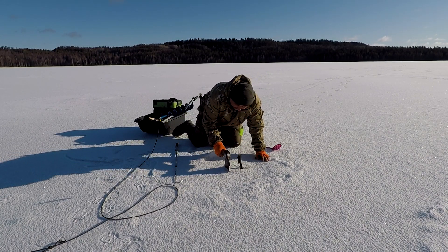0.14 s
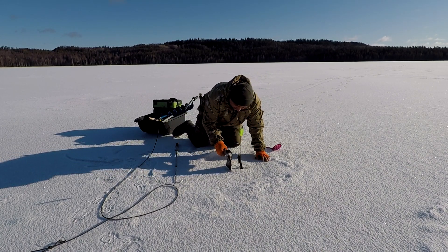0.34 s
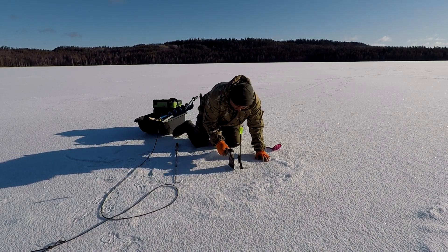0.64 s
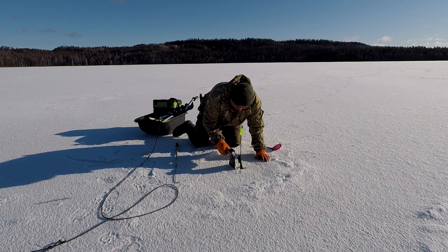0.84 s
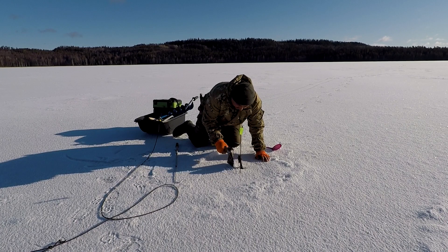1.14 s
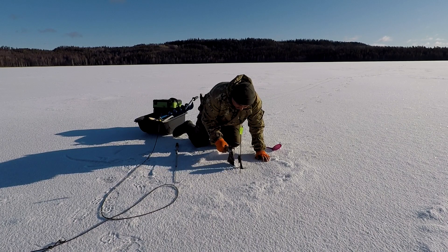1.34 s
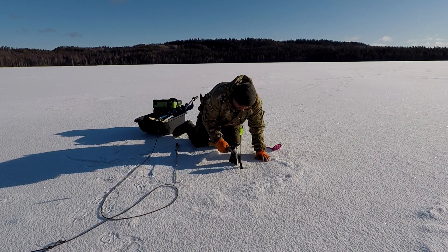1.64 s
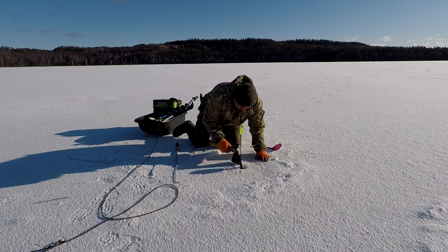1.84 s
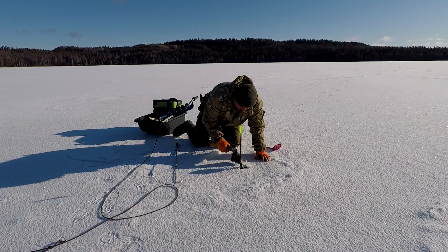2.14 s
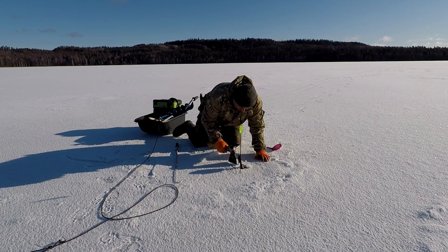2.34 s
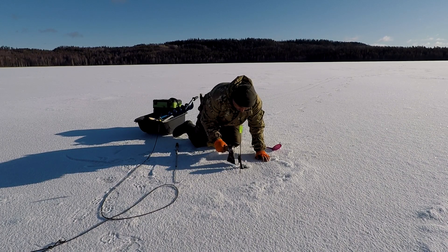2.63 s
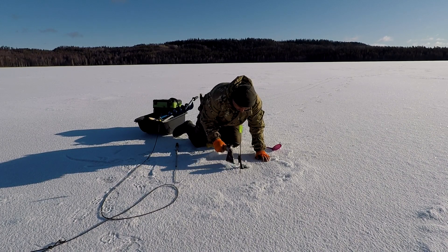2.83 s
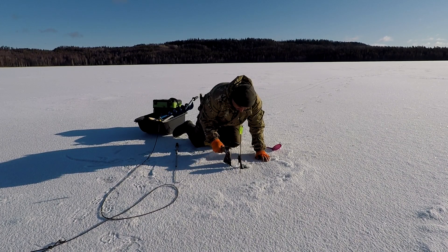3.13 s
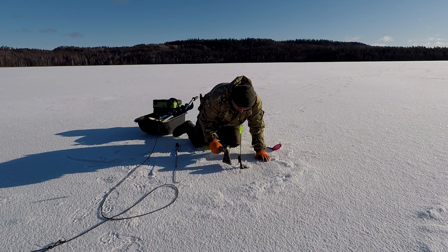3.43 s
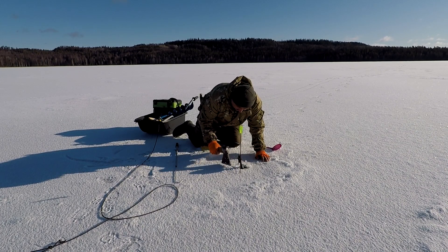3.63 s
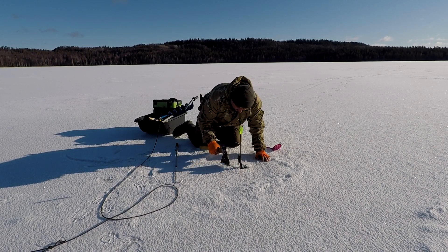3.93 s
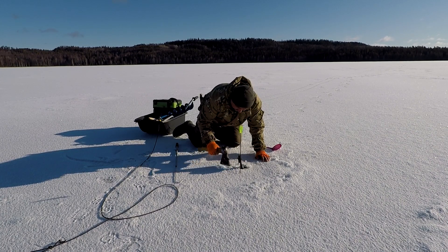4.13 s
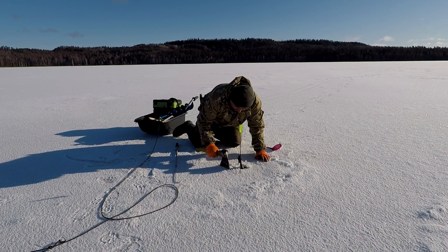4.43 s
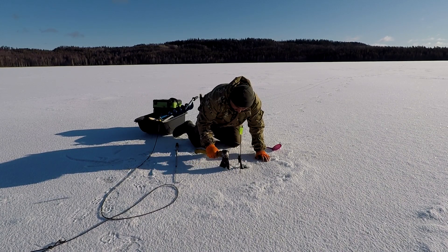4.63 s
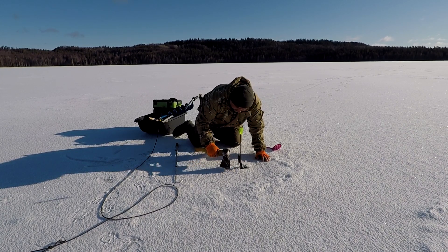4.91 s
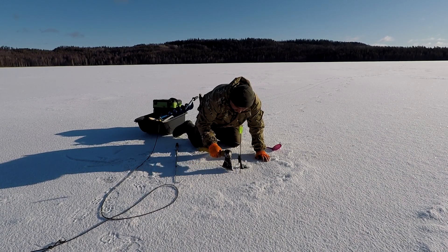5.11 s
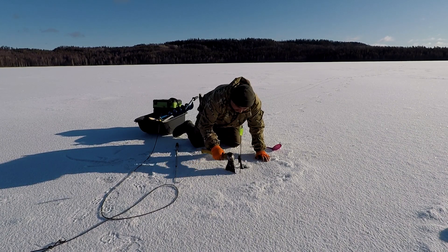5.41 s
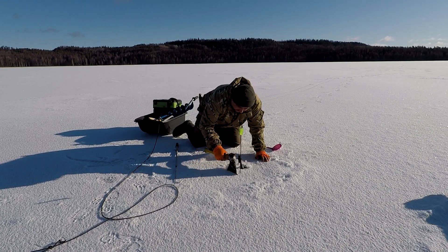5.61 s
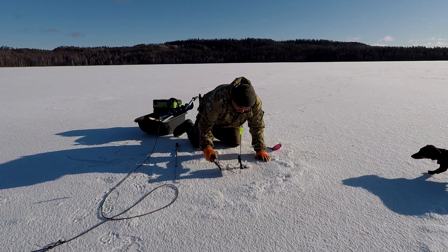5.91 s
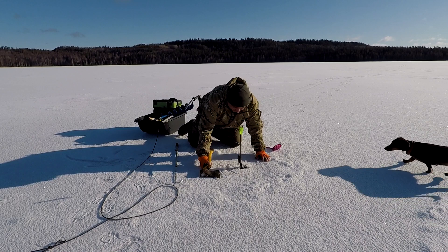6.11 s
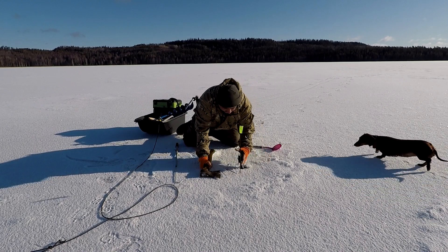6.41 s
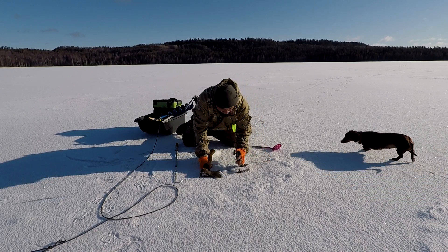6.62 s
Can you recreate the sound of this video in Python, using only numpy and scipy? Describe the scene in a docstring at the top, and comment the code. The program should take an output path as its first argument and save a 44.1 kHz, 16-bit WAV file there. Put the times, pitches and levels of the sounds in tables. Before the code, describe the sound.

On an open frozen lake, a person kneeling at a hole chips the ice with a small steel hatchet, five or six dry crunchy knocks a second, each with a short low thud. Faint metallic rings and small falling chips sit between blows. Wind rumbles on the microphone, strongest in the first three seconds, over steady hiss. Chopping stops at about six seconds; crusted snow then crackles briefly. No echo.

```python
"""A small steel hatchet chips at lake ice, five or six blows a second: noise through resonances crunches
and knocks, swelling sines thud. Sines ring the blade until the next blow; chips drop back as small cracks.
At the end crusted snow breaks under a weight in gritty cracks. Faint narrow-band noise flickers near 5.7 kHz.
Gusty wind, two bands of noise, rumbles on one microphone over its steady noise hiss; the open lake adds no echo.
"""
import sys
import numpy as np
from scipy import signal
from scipy.io import wavfile
from scipy.ndimage import uniform_filter1d

SR = 44100
rng = np.random.default_rng(int(sys.argv[2]) if len(sys.argv) > 2 else 0)


def put_to_file(sound):
    """Save the sound as 16-bit audio at rate SR, in the file named by the first command-line argument."""
    columns = np.atleast_2d(sound).T  # one column per channel
    safe = np.clip(columns, -1, 1)
    whole_steps = np.round(safe * 32767)
    wavfile.write(sys.argv[1], SR, whole_steps.astype(np.int16))


N = 298116

# Microphone hiss spectrum. Each row: frequency in Hz, relative level in dB per Hz.
HISS_SPECTRUM = [(71, 1), (120, 1.5), (1050, -23.5), (1940, -26.5), (3040, -36.5), (5970, -33), (7030, -40),
                 (8620, -31), (13500, -43), (15000, -52), (15900, -89)]
# Gusts at the microphone port. Each row: time in seconds, rumble level in dB, buffeting level in dB.
GUSTS = [(0.0, -23.5, -56), (0.22, -14.5, -26), (0.32, -20.5, -42), (0.81, -18, -19), (0.96, -16, -31),
         (1.09, -11, -18.5), (1.39, -19, -27.5), (1.77, -13.5, -20.5), (1.88, -13.5, -21.5),
         (1.98, -12, -28), (2.18, -10, -13), (2.26, -15, -28.5), (2.48, -10, -11), (2.56, -18.5, -20.5),
         (2.88, -20.5, -31), (4.39, -23, -37.5), (4.58, -11, -20.5), (4.61, -36, -38), (4.7, -24.5, -54),
         (5.35, -28, -43), (5.4, -12, -33), (5.5, -26.5, -39.5), (6.18, -22, -40.5), (6.76, -20.5, -39)]
# Deep wind rumble spectrum. Each row: frequency in Hz, relative level in dB per Hz.
RUMBLE_SPECTRUM = [(4.7, -28), (8.0, 4.5), (32, 2.5), (70, -10.5), (91, -33), (150, -120)]
# Faster wind buffeting spectrum. Each row: frequency in Hz, relative level in dB per Hz.
BUFFET_SPECTRUM = [(30, -51), (55, 2), (70, -4.5), (100, -9.5), (140, -20.5), (250, -29.5), (500, -76)]
# Faint flickering narrow-band noise, under the blows too. Each row: time in seconds, level in dB.
FLICKER_LEVELS = [(3.2, -75), (3.38, -60), (3.46, -70), (3.9, -64), (4.09, -57), (4.18, -71), (4.37, -54),
                  (4.5, -77), (4.68, -50), (4.95, -82), (5.33, -61), (5.7, -91)]
# Crusted snow giving way in steps. Each row: start in seconds, level in dB, low part in dB re crack.
CRUST_STEPS = [(6.4551, -39.5, 2), (6.4708, -44.5, 6), (6.486, -49, 1.1), (6.546, -36, -1),
               (6.560, -26, -2.5), (6.5724, -38, 6), (6.5844, -29.5, 10), (6.5974, -34, 9),
               (6.6174, -41, 7)]
# Ice chips dropping back; the first row is a late dull knock just after the blow at 1.66 s. Each row: start in
# seconds, level in dB, low part in dB re chip.
CHIP_FALLS = [(1.6704, -35.5, 7.5), (1.8776, -40.5, 2), (1.925, -40.5, 4), (2.0398, -51, 15),
              (2.0968, -37, 2), (3.699, -44.5, -2), (4.1086, -44, -14), (4.2014, -51, -6), (4.476, -36, -1),
              (4.706, -40.5, -6), (4.8668, -35.5, -10), (5.918, -50, 5), (5.98, -44, -18),
              (6.1018, -37.5, 8.5)]
# Blade left free to ring. Each row: start in seconds, then the starting level of each blade mode in dB.
BLADE_RINGS = [(0.858, -44, -62, -46), (1.028, -70, -52, -60), (1.232, -54, -52, -43.5),
               (1.718, -70, -70, -55), (2.449, -50, -56, -56), (2.63, -59, -70, -70),
               (2.797, -58, -70, -60), (3.32, -65, -62, -52), (3.72, -61, -70, -59), (3.91, -72, -65, -55),
               (4.11, -58, -60, -60), (5.1, -61, -70, -66), (5.30, -53.5, -65, -62), (5.47, -53, -60, -54),
               (6.053, -62, -30, -46)]
# Modes of the steel blade. Each row: frequency in Hz, time to fall 60 dB in seconds.
BLADE_MODES = [(3268, .5), (5030, .075), (6042, .27)]
# Hatchet blows at the hole. Each row: start in seconds, crunch level in dB, knock in dB re crunch,
# knock frequency in Hz, thud in dB re crunch, thud frequency in Hz, crunch time to fall 60 dB in seconds.
HATCHET_BLOWS = [(0.0024, -34.5, -7, 1330, -14, 320, 0.0095), (0.176, -33.5, -4, 1940, -19, 463, 0.014),
                 (0.3485, -35, -6, 2050, -19, 315, 0.037), (0.5089, -25.5, -5, 1430, -0.5, 583, 0.013),
                 (0.6879, -16.5, -4.5, 2140, 1, 470, 0.014), (0.8467, -23.5, -0.5, 1430, 2.5, 466, 0.043),
                 (1.0042, -24, 2, 1490, 9, 437, 0.027), (1.1703, -26, -0.2, 2240, 5.5, 600, 0.026),
                 (1.3352, -27.5, -6.5, 1430, -2.5, 564, 0.029), (1.5046, -21, -7.5, 1790, 2.5, 590, 0.039),
                 (1.6619, -16.5, -9.5, 2130, .1, 350, 0.055), (1.8332, -16.5, -9.5, 1470, -3.5, 586, 0.036),
                 (2.0075, -18.5, -2, 1530, -1, 343, 0.044), (2.2045, -20, -4, 1760, 3, 394, 0.029),
                 (2.391, -18, -9, 1560, -4.5, 467, .035), (2.5646, -29, -5.5, 1900, -4, 380, 0.023),
                 (2.7456, -27.5, -4.5, 1520, 0.5, 370, 0.019), (2.9193, -21.5, -3, 1410, -1.5, 660, 0.038),
                 (3.1083, -22, -0.5, 1590, -0.5, 390, 0.016), (3.3002, -22, -4.5, 1850, -2, 272, 0.029),
                 (3.4881, -22.5, -7.5, 2020, -3.5, 269, 0.011), (3.679, -22, -5, 1780, -5, 425, 0.02),
                 (3.8678, -20.5, -9.5, 1870, -9.5, 830, 0.038), (4.0592, -23.5, -6.5, 1940, -5, 284, 0.024),
                 (4.2553, -20.5, -7, 1350, -7.5, 566, 0.031), (4.4454, -19.5, -5.5, 1990, -8, 895, 0.044),
                 (4.651, -27, -1.5, 1910, -3, 490, 0.027), (4.846, -23.5, -5.5, 2150, 3.5, 330, 0.01),
                 (5.0504, -24.5, -6, 1840, -9, 840, 0.011), (5.255, -24, -7, 1930, -10, 395, 0.02),
                 (5.449, -27, -2.5, 1880, -8, 360, 0.031), (5.651, -27.5, -2, 1900, -11.5, 346, 0.013),
                 (5.887, -32, 0, 2050, -6, 380, 0.036), (6.0511, -21.5, -5.5, 2750, -10, 870, 0.019)]

HISS_DB = -35.5
LUMPS_DB, LUMP_S = 3, 0.036  # eddies strike the port in short lumps: rms depth, smoothing span
FLICKER_HZ, WANDER_HZ, FLICKER_DB = 5740, 120, 2.5  # centre, then rms wander and rms flicker
HOLD = 1.29  # above 1 the cracking holds a moment, then stops quickly
HANDLE_S, HANDLE_DB, HANDLE_HZ, HANDLE_T60 = 6.053, -33, 855, 0.11
LAST_RING_S = 0.087  # after the last blow the hatchet is laid down
CRUNCH_HZ, UPPER_HZ = 3946, 5960  # lower and upper peak of the crunch
UPPER_DB, UPPER_DB_PER_S = -10, 4.86  # the upper peak gains as the hole deepens
BRIGHT_HZ, BRIGHTEST_HZ = 8500, 12700  # two bright peaks of splintering ice
# Treble and narrow noise grow less than the crunch from blow to blow: level at the reference crunch, dB per dB.
REFERENCE_CRUNCH_DB = -21.5
TREBLE_DB, TREBLE_SLOPE = -41.5, 0.49
NARROW_DB, NARROW_SLOPE = -39, 0.6
NARROW_DB_PER_S = 0.57  # the narrow noise around each blow grows louder over time
EDGE_HZ = 15900  # upper band limit of the microphone chain


def amp(db):
    """Decibels to gain."""
    return 10 ** (np.asarray(db) / 20)


def evened(x):
    """Scales to rms 1."""
    return x / np.sqrt(np.mean(x ** 2) + 1e-20)


def peaked(x):
    """Scales the loudest 3 ms to rms 1."""
    return x / np.sqrt(np.max(uniform_filter1d(x ** 2, size=132)) + 1e-20)


def smoothed(x, span):
    """Two running means along the last axis, span in samples."""
    return uniform_filter1d(uniform_filter1d(x, size=span), size=span)


def drift(seconds):
    """Slow random wandering of rms 1."""
    span = max(round(seconds * SR), 1)
    return evened(smoothed(rng.standard_normal(N), span))


def steadied(x, span):
    """Flattens the slow swells of a noise so that the gust curve sets its level."""
    return x / np.sqrt(smoothed(x ** 2, span) + 0.11)


def resonate(x, hz, width):
    """One causal resonance, width in Hz."""
    r = np.exp(-np.pi * width / SR)
    return signal.lfilter([1 - r, 0, r - 1], [1, -2 * r * np.cos(2 * np.pi * hz / SR), r * r], x)


def steep(x, hz, width):
    """A resonance passed twice: dark skirts."""
    return resonate(resonate(x, hz, width), hz, width)


def add(mix, s, sound):
    """Mixes a sound in from time s, trimming what falls outside."""
    at = round(s * SR)
    sound = sound[max(-at, 0):]
    part = mix[max(at, 0):][:len(sound)]
    part += sound[:len(part)]


def coloured(spectrum, size, patchy_db):
    """Noise of a given spectrum with drifting louder and softer patches."""
    frames = 4 * N // size + 5
    hz = np.fft.rfftfreq(size, 1 / SR)
    real, imaginary, patches = rng.standard_normal((frames, len(hz), 3)).T
    patches = uniform_filter1d(patches, size=10, axis=0)
    patches = evened(uniform_filter1d(patches, size=10, axis=1))
    f, db = np.transpose(spectrum)
    shape = np.interp(np.log(hz + 1), np.log(f + 1), db)[:, None] + patchy_db * patches
    bins = (real + 1j * imaginary) * amp(shape)
    return evened(signal.istft(bins, nperseg=size, noverlap=3 * size // 4)[1][:N])


def hiss():
    """Steady self-noise of the microphone."""
    return amp(HISS_DB) * coloured(HISS_SPECTRUM, size=1024, patchy_db=1.08)


def wind():
    """Pressure eddies at the microphone port: deep rumble and faster buffeting."""
    s, rumble_db, buffet_db = np.transpose(GUSTS)
    t = np.arange(N) / SR
    lumps = LUMPS_DB * drift(LUMP_S)
    rumble = steadied(coloured(RUMBLE_SPECTRUM, size=8192, patchy_db=0.5), span=2500)
    buffet = steadied(coloured(BUFFET_SPECTRUM, size=4096, patchy_db=2.5), span=2000)
    rumble *= amp(np.interp(t, s, rumble_db) + lumps)
    buffet *= amp(np.interp(t, s, buffet_db) + 1.06 * lumps)
    return rumble + buffet


def narrow_flicker():
    """A faint narrow band of flickering noise around a wandering centre, under the blows too."""
    s, db = np.transpose(FLICKER_LEVELS)
    t = np.arange(N) / SR
    band = smoothed(rng.standard_normal((2, N)), 90)
    phase = 2 * np.pi * np.cumsum(FLICKER_HZ + WANDER_HZ * drift(0.027)) / SR
    tone = evened(band[0] * np.cos(phase) + band[1] * np.sin(phase))
    level = np.interp(t, s, db, left=-np.inf, right=-np.inf)  # silent outside the table
    return tone * amp(level + FLICKER_DB * drift(0.037))


def fractures(t, t60, rise, lumpy_db, lead_db=-60, lead_s=0.0013):
    """Ice breaks in a quick run of uneven cracks; a brief noise swell leads into them before t = 0."""
    noise, size = rng.standard_normal((2, len(t)))
    lumps = amp(lumpy_db * evened(uniform_filter1d(size, size=30)))
    after = np.maximum(t, 0)
    breaking = (1 - np.exp(-after / rise)) ** 2 * amp(-60 * (after / t60) ** HOLD)
    lead = amp(lead_db - 60 * after / t60) * np.exp(np.minimum(t, 0) / lead_s)
    return noise * lumps * (breaking + lead)


def crack(s, db, low_db, hz, t60, dull_hz, dull_width, mid_db, rise):
    """A small crack with a dull pat under it."""
    t = np.arange(round(0.07 * SR)) / SR
    cracks = fractures(t, t60, rise, 6.0)
    bright = steep(cracks, hz, 2240)
    bright += amp(-15) * steep(cracks, 5400, 3200)
    bright += amp(-16.5) * steep(cracks, BRIGHTEST_HZ, 3000)
    dull = steep(cracks, dull_hz, dull_width)
    dull += amp(-2) * steep(cracks, 510, 214)
    dull += amp(mid_db) * steep(cracks, 1280, 1100)
    return s - 0.001, amp(db) * (peaked(bright) + amp(low_db) * peaked(dull))


def crust(*row):
    """Snow crust breaks, longer and grittier than a chip."""
    return crack(*row, hz=4320, t60=0.052, dull_hz=632, dull_width=200, mid_db=-14.5, rise=0.0014)


def chip(*row):
    """A chip of ice lands with a short crack and a dull pat."""
    return crack(*row, hz=4930, t60=0.03, dull_hz=675, dull_width=410, mid_db=-6, rise=0.00074)


def ring(s, *mode_db, modes=BLADE_MODES):
    """The steel's modes die away and stop when the edge bites again."""
    ends = [row[0] for row in HATCHET_BLOWS if row[0] > s + 0.02] + [s + LAST_RING_S]
    t = np.arange(round((ends[0] - s) * SR)) / SR
    tone = np.zeros(len(t))
    for db, (hz, t60) in zip(mode_db, modes):
        tone += amp(db - 60 * t / t60) * np.sin(2 * np.pi * hz * t)
    fade_in = np.minimum(t / 0.00086, 1)
    fade_out = np.minimum((t[-1] - t) / 0.0037, 1)
    return s, tone * fade_in * fade_out


def handle():
    """The handle rings once, as a single decaying mode, on the last blow."""
    return ring(HANDLE_S, HANDLE_DB, modes=[(HANDLE_HZ, HANDLE_T60)])


def blow(s, db, knock_db, knock_hz, thud_db, thud_hz, t60):
    """Cracks ring the ice briefly at several pitches; the hole thuds a moment later."""
    t = np.arange(round(0.11 * SR)) / SR - 0.025
    cracks = fractures(t, t60, 0.00069, 4.5, lead_db=-6)
    # splinters patter on after the cracks
    spray = cracks + amp(-26.5) * fractures(t, 4.4 * t60, 0.0024, 4.0)
    crunch = steep(cracks, CRUNCH_HZ, 880)
    crunch += amp(7.5) * steep(spray, 4380, 1770)
    crunch += amp(UPPER_DB + UPPER_DB_PER_S * s) * steep(cracks, UPPER_HZ, 333)
    knock = steep(cracks, knock_hz, 300) + amp(-5.5) * steep(spray, 1920, 740)

    fizz = fractures(t, 1.36 * t60, 0.00092, 4.6, lead_db=-4, lead_s=0.0071)
    treble = steep(fizz, BRIGHT_HZ, 800) + amp(-7) * steep(fizz, BRIGHTEST_HZ, 2200)

    swell = np.maximum(t - 0.0006, 0) / 0.0028
    swell = (swell * np.exp(1 - swell)) ** 2.83
    thud = peaked(np.sin(2 * np.pi * thud_hz * t) * swell)
    thud += amp(-3.0) * peaked(steep(cracks, 480, 370))
    # the ice sheet gives a little
    push = amp(-9.0) * peaked(np.sin(2 * np.pi * 200 * t) * swell)

    # narrow noise near 5.2 and 5.9 kHz swells and fades evenly around each blow
    swelling = rng.standard_normal(len(t)) * np.exp(-(t / 0.012) ** 2)
    narrow_noise = steep(swelling, 5880, 380) + amp(-6) * steep(swelling, 5170, 260)

    body = peaked(crunch) + amp(knock_db) * peaked(knock) + amp(thud_db) * thud + push
    harder_db = db - REFERENCE_CRUNCH_DB
    treble_db = TREBLE_DB + TREBLE_SLOPE * harder_db
    narrow_db = NARROW_DB + NARROW_SLOPE * harder_db + NARROW_DB_PER_S * s
    sound = amp(db) * body + amp(treble_db) * peaked(treble) + amp(narrow_db) * peaked(narrow_noise)
    return s - 0.0255, sound


def scene():
    """Wind, hiss and narrow flicker lie behind the crust, chips, ringing steel and hatchet blows."""
    mix = wind() + hiss() + narrow_flicker()
    sources = ((CRUST_STEPS, crust), (CHIP_FALLS, chip), (BLADE_RINGS, ring), (HATCHET_BLOWS, blow))
    for table, source in sources:
        for row in table:
            add(mix, *source(*row))
    add(mix, *handle())
    return mix[None]


def record(dry):
    """The microphone chain: soft overload on the strongest peaks, then the band limit."""
    knee = 1.8
    overloaded = knee * np.tanh(dry / knee)
    band_limit = signal.firwin(511, EDGE_HZ, window=("kaiser", 9), fs=SR)
    return signal.oaconvolve(overloaded, band_limit[None], "same")


dry = scene()
out = record(dry)
put_to_file(out)
```